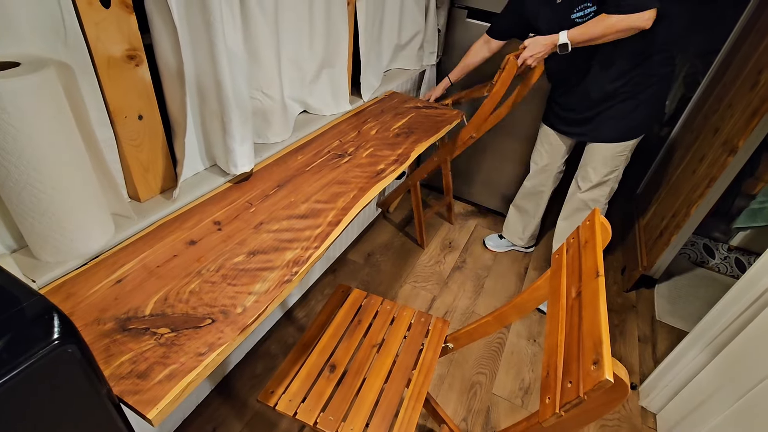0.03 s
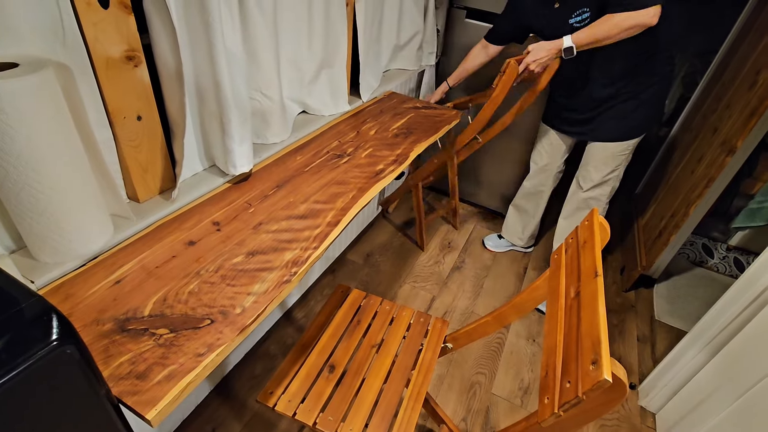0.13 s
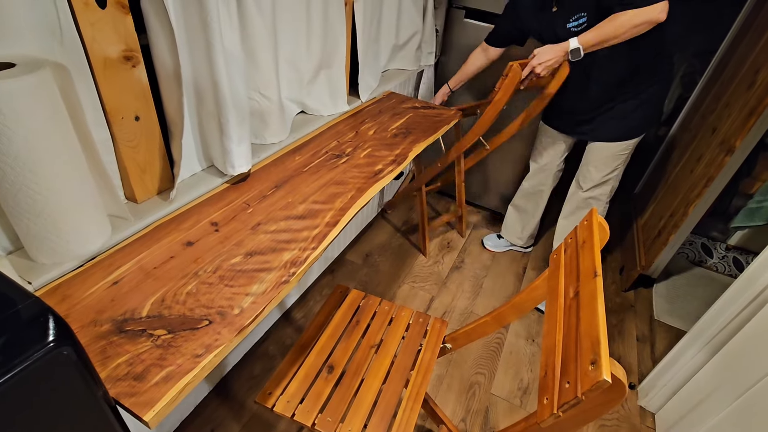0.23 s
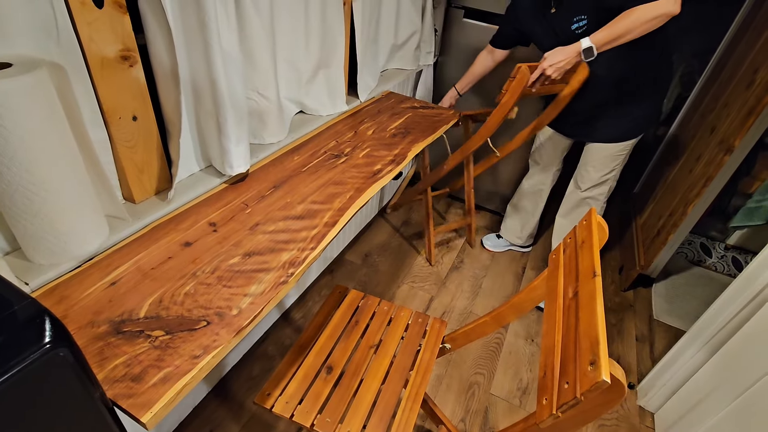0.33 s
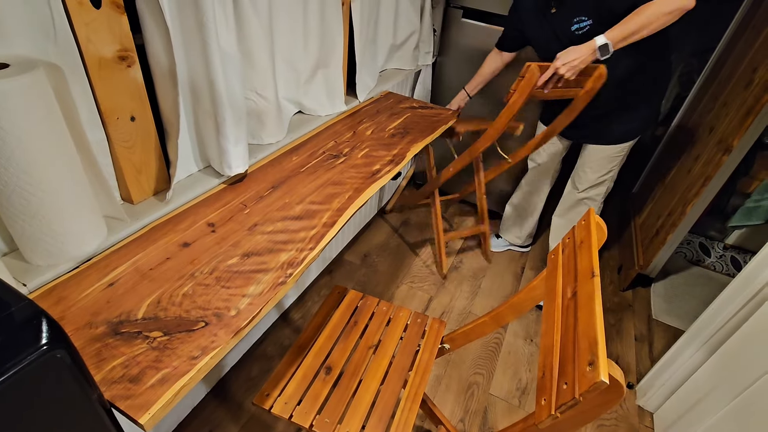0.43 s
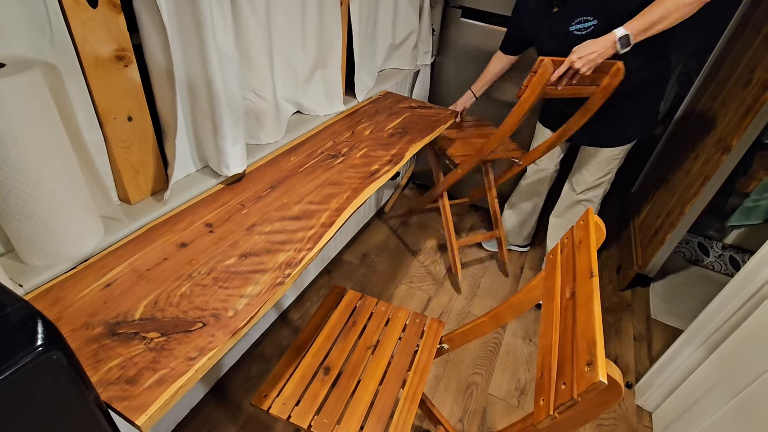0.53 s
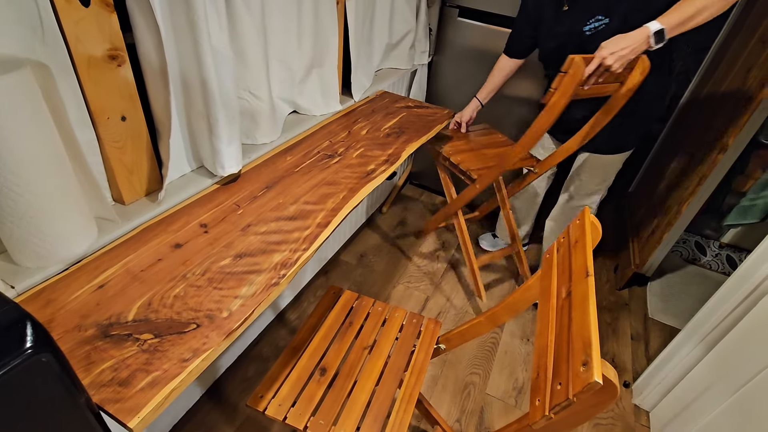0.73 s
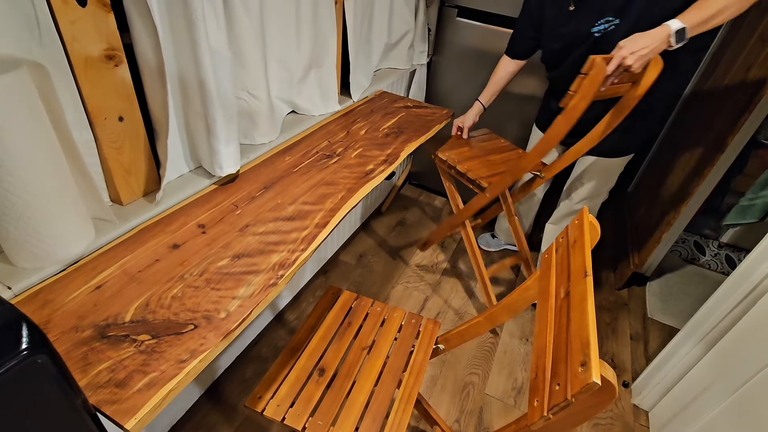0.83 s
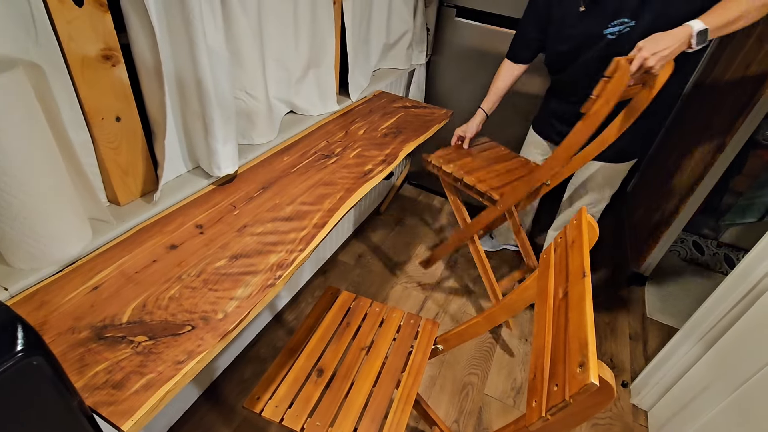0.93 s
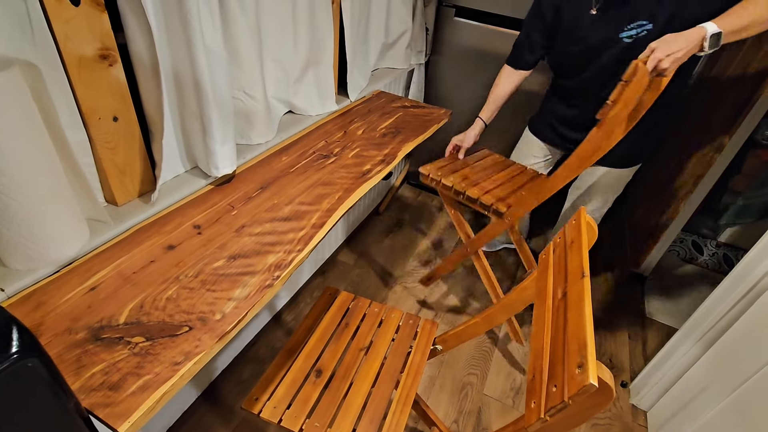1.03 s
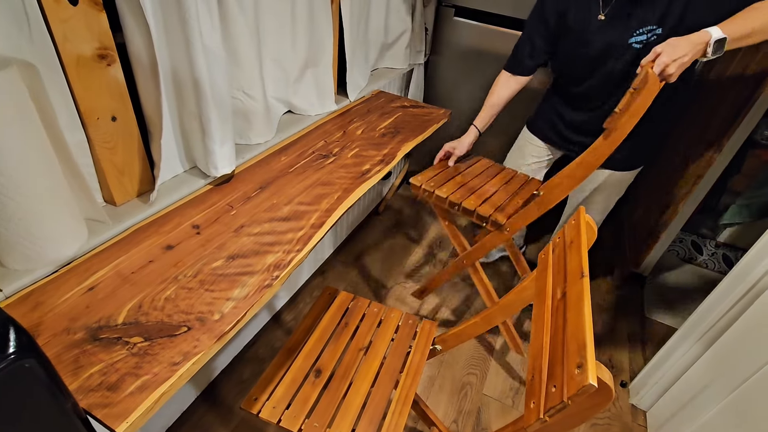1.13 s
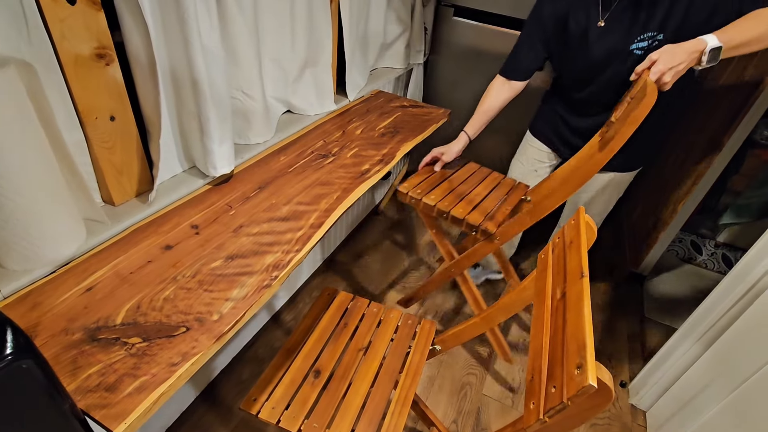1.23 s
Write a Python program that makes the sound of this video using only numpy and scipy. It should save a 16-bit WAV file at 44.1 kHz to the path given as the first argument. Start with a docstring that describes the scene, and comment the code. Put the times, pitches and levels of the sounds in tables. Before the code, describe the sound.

A wooden folding chair is opened in a small room. Its legs scuff and knock lightly from the start, with a low, hollow bump on the floor at about 0.25 seconds. At 0.5 seconds the seat snaps into place with one sharp, loud clack that dies away quickly. Faint rubbing and soft knocks follow from 0.9 to 1.3 seconds. A quiet appliance hum and low rumble continue underneath.

```python
"""A wooden folding chair is opened in a small, wood-lined room. First its legs scuff and knock, driving the
modes of the hollow floor, and the slats slide with friction. Near half a second the seat strikes its two stops
and rebounds: two sharp clacks and a fainter third, in which slats and frame vibrate freely and the room
reverberates. Faint handling follows. An appliance's hum and a low rumble lie under it all."""
import sys
import numpy as np
from scipy import signal
from scipy.fft import rfft, irfft, next_fast_len
from scipy.io import wavfile
from scipy.ndimage import map_coordinates

SR = 44100
rng = np.random.default_rng(int(sys.argv[2]) if len(sys.argv) > 2 else 0)


def generate_wav(signal):
    """Clip the signal to [-1, 1] and save it as 16-bit WAV at the path in sys.argv[1]."""
    frames = np.transpose(np.atleast_2d(signal))
    scaled = np.clip(frames, -1, 1) * 32767
    pcm = np.round(scaled).astype(np.int16)
    wavfile.write(sys.argv[1], SR, pcm)


N = 57330


# Two stops and a rebound. Each row: start in seconds, crack level in dB, rise in seconds, treble tilt
# in dB per octave, bass lift in dB, then the levels of slats, frame and room in dB.
SEAT_IMPACTS = [(0.4864, -13, .0012, -1.5, -6, -8.5, -27, -8.5),
                (0.5041, -11.5, .0004, 1.03, 3, -14.5, -22, -10),
                (0.516, -23, 0.0014, 1.5, 1.5, -24.5, -33, -16)]
# Heavily damped modes of the slats. Each row: frequency in Hz, level in dB, T60 in seconds.
SLAT_MODES = [(624, -16, 0.047), (818, -15, 0.047), (1060, -7.5, .045), (1338, -10, 0.051),
              (1935, -2, 0.021), (2252, 2.5, 0.038), (2800, 0, 0.0094), (3410, 9, 0.0077)]
# Modes of the frame and its steel pivots. Each row: frequency in Hz, level in dB, T60 in seconds.
FRAME_MODES = [(237, -15, .2), (587, -9, .16), (640, -10, .15), (1174, -9, .14), (1349, -8, .16),
               (1400, -9, .18), (1952, -5, .15), (2026, -1, .15), (2096, -4, .16), (2186, 1.5, .155),
               (2378, -4, .13), (2627, -4, .17), (2794, -4, .17), (2934, -4, .17), (3360, -4, .17),
               (3544, -1, .16), (3944, 0, .17), (4680, -6, .15), (5030, -4, .16), (6312, -5, .16),
               (7321, -13, .15), (9232, -14, .11), (11610, -14, .12)]
def seat_clack(lead_s=.002, lead_db=-3.5, crack_t60=.055, cutoff_hz=95):
    """Impact excitation: each blow gives a broadband crack and excites the slats, frame and room."""
    out = np.zeros((2, N))
    for start, crack_db, rise_s, tilt_db, bass_db, slats_db, frame_db, room_db in SEAT_IMPACTS:
        t, early = since(start), since(start - lead_s)
        blow = rise(t, rise_s) * fall(t, crack_t60)
        light_touch = amp(lead_db) * rise(early, rise_s) * fall(early, crack_t60)
        out += amp(crack_db) * (light_touch + blow) * crack_noise(tilt_db, bass_db)
        modes = amp(slats_db) * ringing(SLAT_MODES, t) + amp(frame_db) * ringing(FRAME_MODES, t)
        out += rise(t, rise_s) * modes
        out += amp(room_db) * room_tail(crack_noise(tilt_db, bass_db), start)
    # The clack carries little below the cutoff.
    return filtered(out, lambda hz: -hz * hz / (cutoff_hz ** 2 - hz * hz + 1j * hz * cutoff_hz))


# Spectrum of the wooden crack. Each row: frequency in Hz, spectral level in dB.
CRACK_SPECTRUM = [(50, -38.5), (110, -12.5), (175, -13.5), (240, -8.5), (400, -14.5), (500, -9), (620, -4),
                  (930, -5.5), (1350, -2.5), (1750, -2.5), (2140, 0.5), (2550, -2), (3600, 1.5), (5000, -4),
                  (6500, -5.5), (9000, -11), (12000, -12), (14000, -13.5), (15500, -24.5)]
RIPPLE_HZ = np.arange(0, SR / 2, 110)
RIPPLE_DB = 2.5 * rng.standard_normal(len(RIPPLE_HZ)) * np.minimum(RIPPLE_HZ / 4000, 1)
def crack_noise(tilt_db, bass_db):
    """Coloration: noise of the wooden crack, with an unchanging random ripple across its treble."""
    smooth = noise(CRACK_SPECTRUM, tilt_db, bass_db)
    return unit(filtered(smooth, lambda hz: np.interp(hz, RIPPLE_HZ, amp(RIPPLE_DB))))


# Reverberation times of the room. Each row: frequency in Hz, T60 in seconds.
ROOM_DECAY = [(100, 0.12), (250, .22), (550, .16), (1400, 0.15), (3500, 0.18), (9000, 0.17), (15000, .16)]
def room_tail(x, start, build_s=.006):
    """Reverberation: the sound builds up, then each frequency decays at its own rate."""
    hz, t, spectra = signal.stft(x, SR, nperseg=256)
    spectra *= fall(np.maximum(t - start, 0), along(ROOM_DECAY, hz)[:, None])
    return signal.istft(spectra, SR, nperseg=256)[1][:, :N] * rise(since(start), build_s)


# Weight landing on the floor. Each row: start in seconds, level in dB.
FLOOR_LOADS = [(0.2409, -20), (0.27, -37), (0.618, -46.5), (1.051, -43), (1.231, -43)]
# Modes of the hollow floor. Each row: frequency in Hz, level in dB, T60 in seconds.
FLOOR_MODES = [(37.8, -12.5, 0.69), (57.5, -6, .42), (76, -5.5, 0.36), (108.4, 0.5, 0.23),
               (115.5, -9.5, 0.11), (271, -16.5, 0.2)]
def floor_boom(rise_s=.004):
    """Free vibration: a sudden load sets the boards booming in their low modes."""
    out = np.zeros(N)
    for start, load_db in FLOOR_LOADS:
        t = since(start)
        boards = sum(amp(db) * fall(t, t60) * np.sin(2 * np.pi * hz * t) for hz, db, t60 in FLOOR_MODES)
        out -= amp(load_db) * rise(t, rise_s) * boards
    return out


# Legs knocking the floor. Each row: start in seconds, level in dB, T60 in seconds, bass lift in dB.
LEG_KNOCKS = [(0.061, -39, 0.25, 4), (0.133, -37, 0.6, 5), (0.184, -31, 0.44, -2), (0.246, -34, 0.22, 35),
              (1.05, -45, 0.0554, 10.5), (1.226, -44, 0.23, 1)]
# Spectrum of a dull knock. Each row: frequency in Hz, spectral level in dB.
KNOCK_SPECTRUM = [(35, -23), (80, -4), (135, 1), (200, -9), (300, -5.5), (400, -8.5), (600, -17),
                  (900, -18.5), (1150, -19), (2000, -35), (6000, -52), (15000, -70.5)]
def leg_knocks(rise_s=.004):
    """Soft impact: a slow contact puts most of its energy into low frequencies."""
    out = np.zeros((2, N))
    for start, db, t60, bass_db in LEG_KNOCKS:
        t = since(start)
        out += amp(db) * rise(t, rise_s) * fall(t, t60) * noise(KNOCK_SPECTRUM, bass_db=bass_db)
    return out


# Legs touching down. Each row: start in seconds, level in dB.
LEG_TAPS = [(0.186, -51), (0.247, -38.5)]
# Resonances of the legs. Each row: frequency in Hz, bandwidth in Hz, peak gain in dB.
LEG_RESONANCES = [(530, 37, 3), (903, 40, 3), (1133, 22, 7), (2110, 77, 5.5), (3390, 95.3, 4.5),
                  (4040, 84, 1)]
def leg_taps(rise_s=.0024, t60=.098):
    """Impulse response: a tapped leg rings briefly at its natural frequencies."""
    top_db = max(db for _, _, db in LEG_RESONANCES)
    modes = [(hz, db - top_db, t60) for hz, _, db in LEG_RESONANCES]
    return sum(amp(db) * rise(since(start), rise_s) * ringing(modes, since(start))
               for start, db in LEG_TAPS)


# Wood sliding on wood and under the hands. Each row: peak time in seconds, level in dB,
# rise in seconds, T60 in seconds, treble tilt in dB per octave.
SCUFF_STROKES = [(0.125, -53.5, 0.069, 1, 2.5), (0.2, -49.5, 0.027, 0.6, 3.5),
                 (0.252, -34, 0.013, 0.17, 0.44), (0.311, -52, .03, 1.0, 0.3),
                 (0.483, -40.5, .022, .05, -0.5), (0.883, -55.5, 0.00424, 0.19, 1.5),
                 (0.928, -51.5, 0.026, 0.32, -3.5), (0.945, -64.5, 0.017, .15, 3.5),
                 (1.091, -63.5, 0.036, .3, 2), (1.224, -47.5, 0.0027, 0.053, -5),
                 (1.254, -54, 0.026, 0.32, 3.5)]
# Spectrum of sliding wood. Each row: frequency in Hz, spectral level in dB.
FRICTION_SPECTRUM = [(50, -41.5), (200, -13.5), (500, -3.5), (1100, 2), (1700, -2), (2400, -2),
                     (3600, -0.5), (5000, -7.5), (8000, -14), (10500, -20), (14000, -19)]
def scuffs():
    """Source and filter: friction noise swells and fades, coloured by the resonances of the legs."""
    out, t = np.zeros((2, N)), since(0)
    for peak_s, db, rise_s, t60, tilt_db in SCUFF_STROKES:
        swell = np.exp(-(np.minimum(t - peak_s, 0) / rise_s) ** 2)
        out += amp(db) * swell * fall(since(peak_s), t60) * noise(FRICTION_SPECTRUM, tilt_db)
    def legs(hz):
        return 1 + sum((amp(db) - 1) * 1j * hz * width / (centre ** 2 - hz * hz + 1j * hz * width)
                       for centre, width, db in LEG_RESONANCES)
    return filtered(out, legs)


# Partials of the appliance. Each row: frequency in Hz, RMS level in dB.
HUM_PARTIALS = [(118.4, -58.5), (177.6, -57.5), (360.7, -53), (452, -67.5), (543.7, -66.5), (721.4, -60)]
def appliance_hum(left_lag_s=.00038, waver_db=1.5, flutter_depth=.4, drift_rad=.35):
    """Random modulation: each partial of a line spectrum wavers in amplitude and phase."""
    t, hum = np.array([since(left_lag_s), since(0)]), 0
    for hz, db in HUM_PARTIALS:
        level = amp(db + waver_db * wobble(17)) * (1 + flutter_depth * wobble(45))
        hum += level * np.sqrt(2) * np.sin(2 * np.pi * hz * t + drift_rad * wobble(22))
    return hum


# Spectrum of the room's background. Each row: frequency in Hz, spectral level in dB.
RUMBLE_SPECTRUM = [(25, -16.5), (60, -1.5), (120, -9), (175, -6), (215, -13), (260, -10.5), (360, -11),
                   (420, -13), (480, -11.5), (600, -15.5), (730, -13), (900, -24), (1400, -20), (1800, -26),
                   (2300, -25), (3300, -27), (5000, -37), (7000, -39.5), (9500, -52.5), (15000, -54)]
def rumble(level_db=-48):
    """Stationary noise: a steady, continuous spectrum weighted to the bass."""
    return amp(level_db) * noise(RUMBLE_SPECTRUM)


# Likeness of left and right. Each row: frequency in Hz, correlation from -1 to 1.
STEREO_CORRELATION = [(60, 1), (150, 0.65), (300, 1), (640, 0.52), (1400, -0.2), (2200, 0.33),
                      (4000, -0.0053), (12000, 0)]
def stereo_angle(hz):
    """Correlation is the cosine of this angle: near mono in the bass, diffuse in the treble."""
    return np.arccos(np.clip(along(STEREO_CORRELATION, hz), -1, 1))


def ringing(modes, t):
    """Modal superposition: damped sines of alternating sign, shifted in phase between left and right by the
    stereo angle."""
    out = np.zeros((2, N))
    for k, (hz, db, t60) in enumerate(modes):
        phase = rng.choice([-1, 1]) * stereo_angle(hz) * np.array([[.5], [-.5]])
        out += (-1) ** k * amp(db) * fall(t, t60) * np.sin(2 * np.pi * hz * t + phase)
    return out


def noise(spectrum, tilt_db=0, bass_db=0):
    """Spectral shaping: white noise becomes coloured, partly correlated stereo noise of unit RMS."""
    def response(hz):
        angle = stereo_angle(hz) / 2
        shade_db = tilt_db * np.log2(np.maximum(hz, 700) / 3000) + bass_db / (1 + (hz / 700) ** 2)
        low_cut = rise(hz ** 2, 20 ** 2)
        return amp(along(spectrum, hz) + shade_db) * [np.cos(angle), np.sin(angle)] * low_cut
    mid, side = filtered(rng.standard_normal((2, N)), response)
    return unit(np.array([mid + side, mid - side]))


def amp(db):
    return 10 ** (np.asarray(db) / 20)


def unit(x):
    return x / np.sqrt(np.mean(x ** 2) + 1e-20)


def along(points, hz):
    """Interpolation on a logarithmic frequency axis."""
    knots_hz, values = np.transpose(points)
    return np.interp(np.log(hz + 1), np.log(knots_hz + 1), values)


def since(start):
    """Elapsed seconds, zero before the start."""
    return np.maximum(np.arange(N) / SR - start, 0)


def fall(t, t60):
    """Exponential decay by 60 dB in t60."""
    return np.exp(-np.log(1000) * t / t60)


def rise(t, constant):
    """Exponential approach from zero to one."""
    return 1 - np.exp(-t / constant)


def wobble(knots_per_s):
    """Spline interpolation of random values."""
    return map_coordinates(rng.standard_normal(N // 8), [np.arange(N) * knots_per_s / SR], mode="wrap")


def filtered(x, response):
    """Linear filtering: the spectrum is multiplied by a frequency response."""
    size = next_fast_len(N + SR // 4)
    return irfft(rfft(x, size) * response(np.fft.rfftfreq(size, 1 / SR)), size)[..., :N]


# Stereo balance. Each row: frequency in Hz, left minus right level in dB.
LEVEL_DIFFERENCE = [(60, 1), (200, 2.5), (380, 0.8), (700, 0.5), (1200, 2), (2200, -1.9), (4400, -2.5),
                    (8000, 2), (14000, -0.7)]
def scene():
    """Superposition: the sources add, and each frequency leans a little to one side."""
    mix = seat_clack() + floor_boom() + leg_knocks() + leg_taps() + scuffs() + appliance_hum() + rumble()
    return filtered(mix, lambda hz: amp(along(LEVEL_DIFFERENCE, hz) * np.array([[.5], [-.5]])))


def record(dry, top_hz=15250):
    """Saturation rounds the highest peaks; a steep low-pass limits the bandwidth."""
    rounded = dry / (1 + np.abs(dry) ** 8) ** (1 / 8)
    return filtered(rounded, lambda hz: 1 / np.sqrt(1 + (hz / top_hz) ** 120))


dry = scene()
out = record(dry)
generate_wav(out)
```